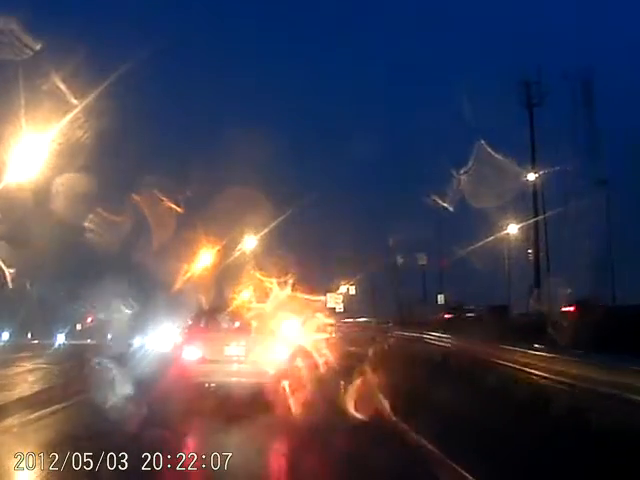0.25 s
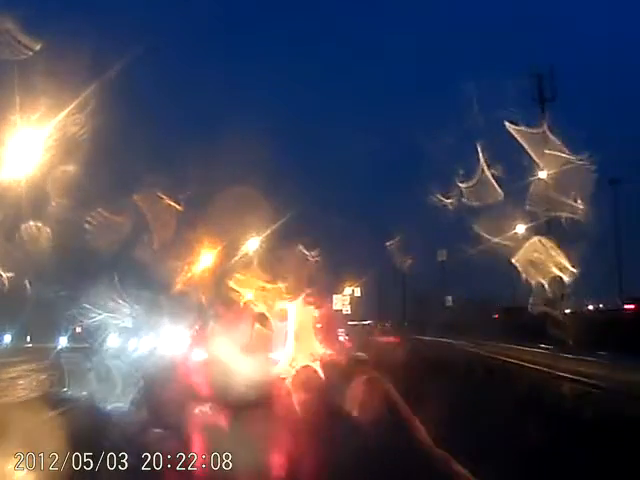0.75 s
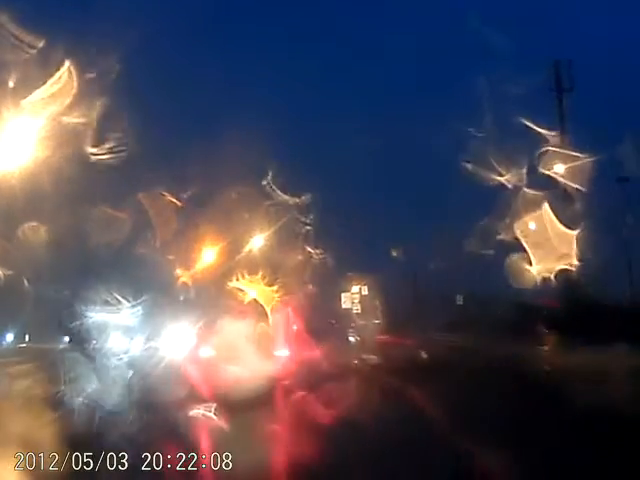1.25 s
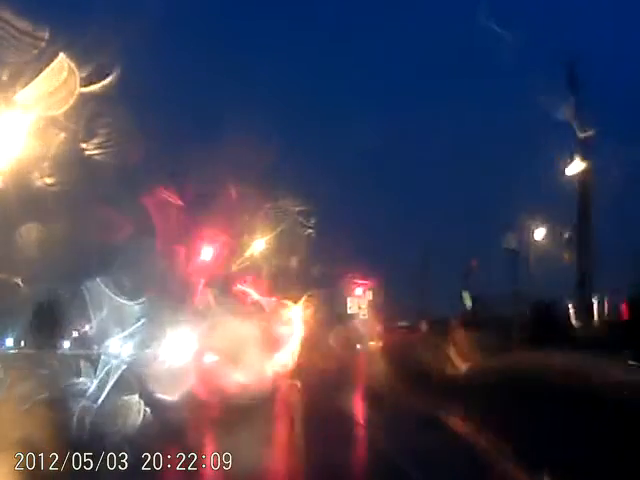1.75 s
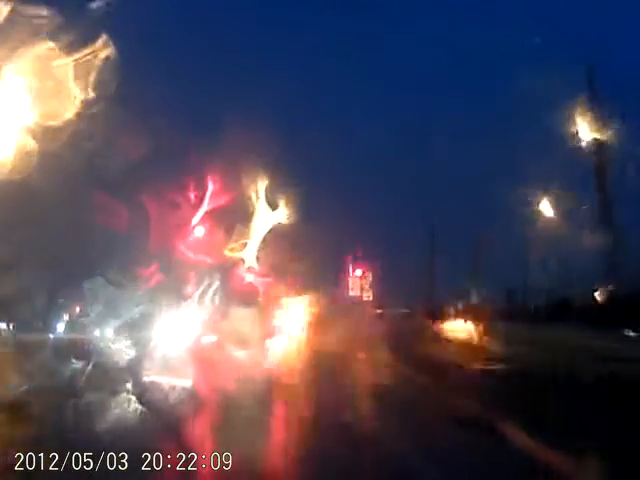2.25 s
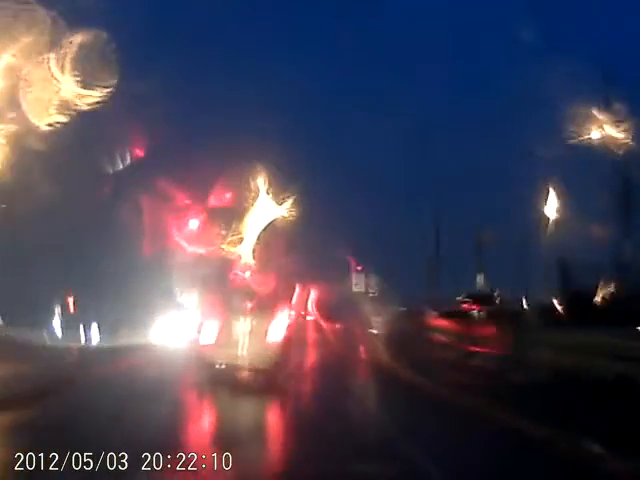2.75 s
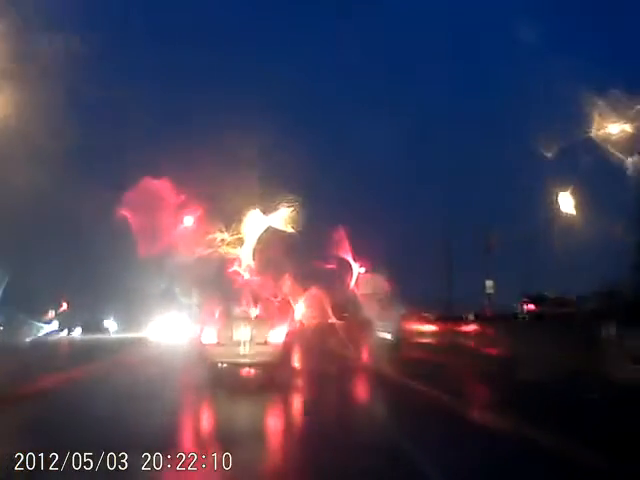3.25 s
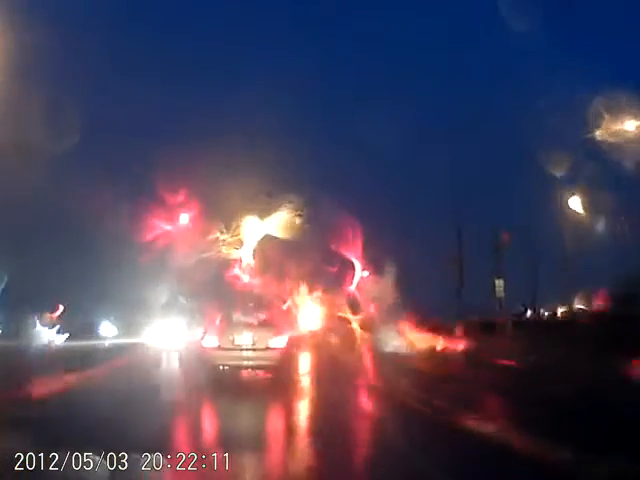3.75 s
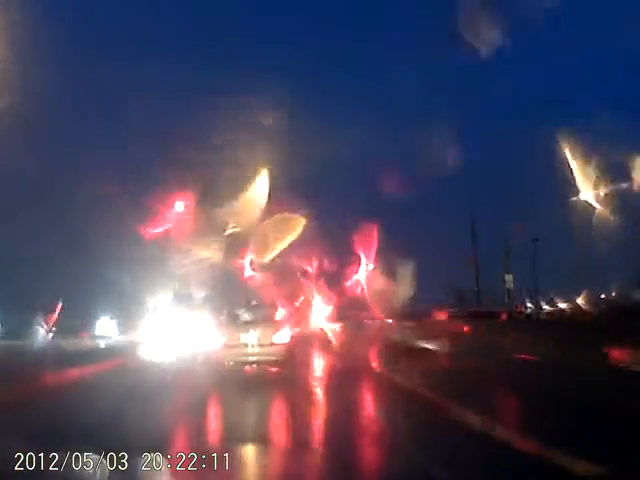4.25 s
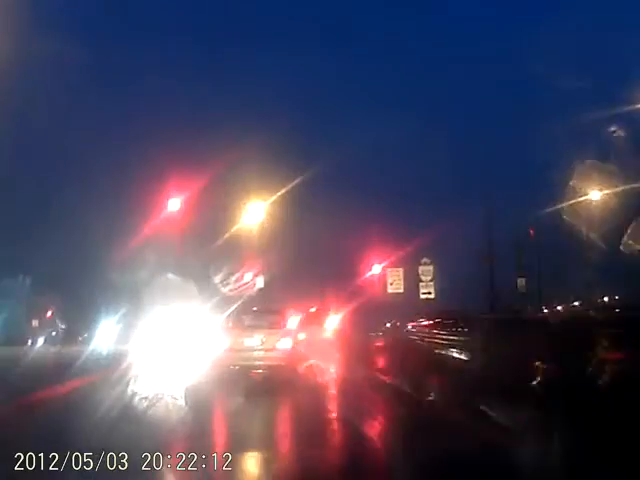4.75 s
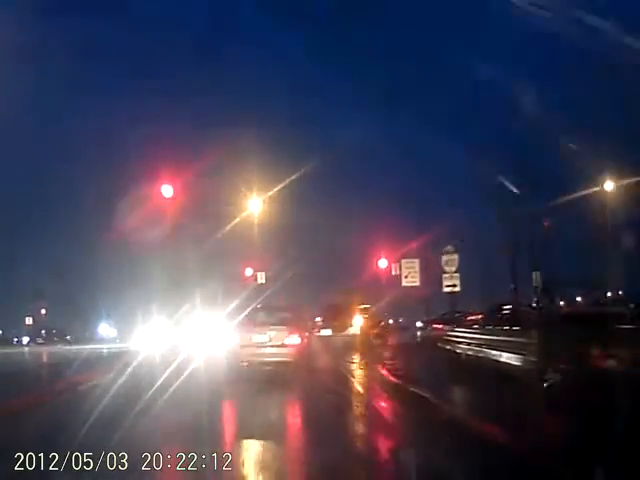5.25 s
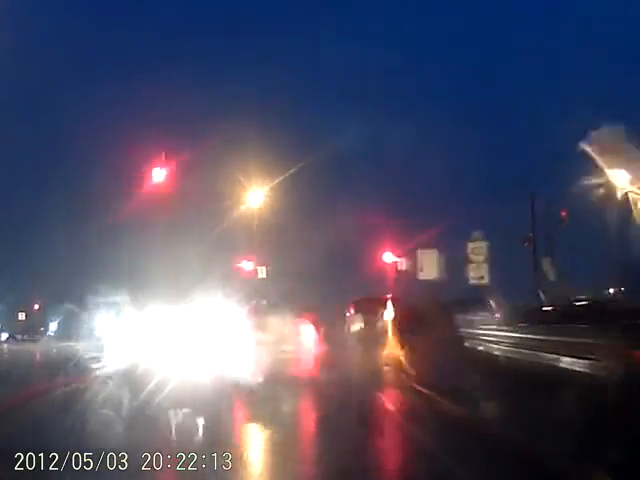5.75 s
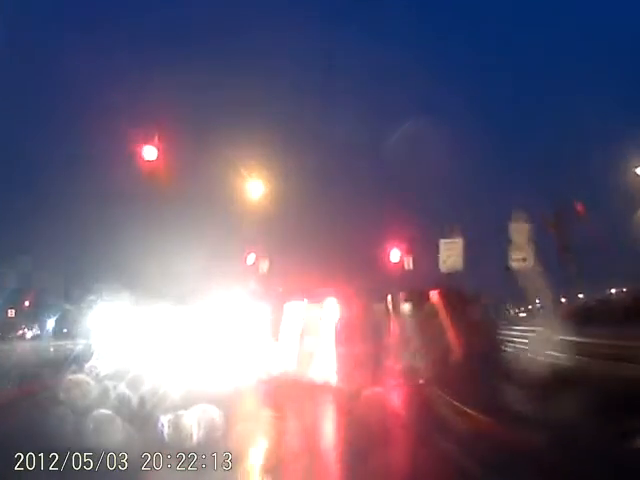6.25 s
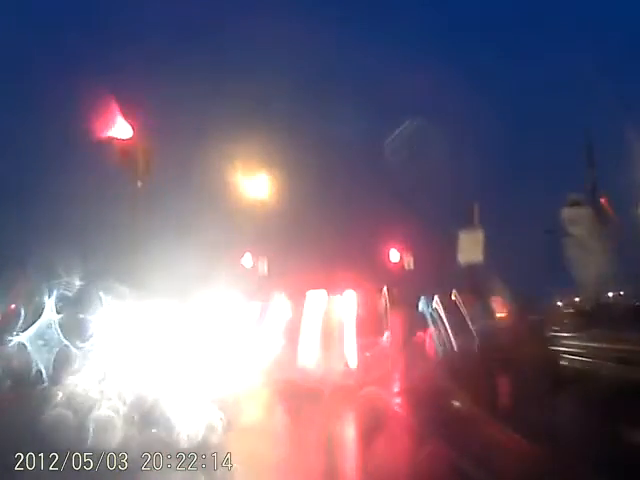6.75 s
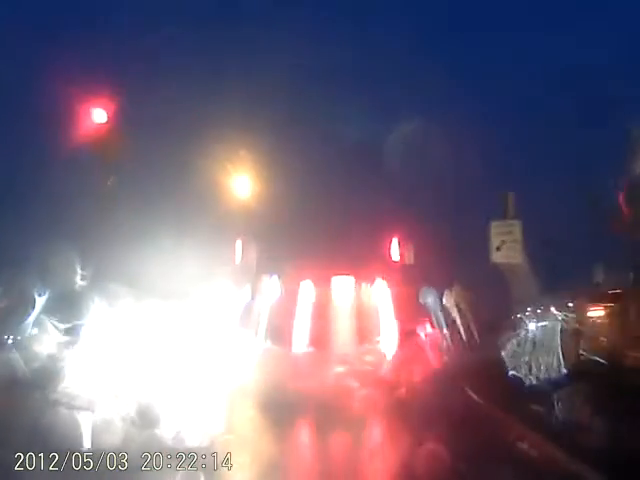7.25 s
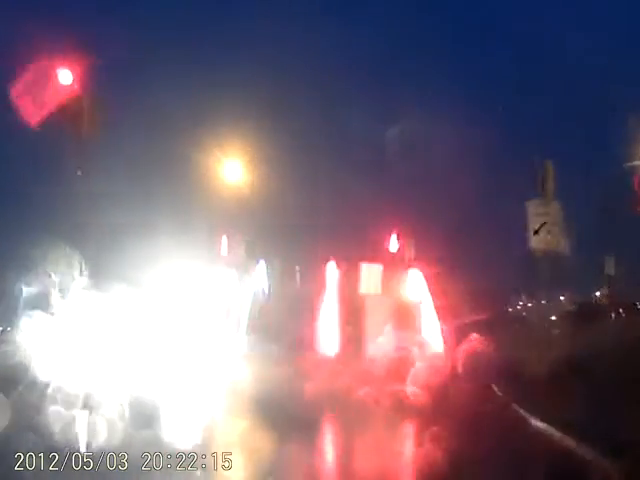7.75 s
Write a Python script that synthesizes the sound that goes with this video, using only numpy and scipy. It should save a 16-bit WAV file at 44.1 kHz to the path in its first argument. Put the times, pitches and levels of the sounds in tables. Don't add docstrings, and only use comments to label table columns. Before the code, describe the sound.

Inside a car on a wet road, rain ticks and taps on windshield and roof over a low engine drone that rises, drops and sinks away.

```python
import sys
import numpy as np
from scipy import signal
from scipy.fft import rfft, irfft
from scipy.io import wavfile
from scipy.ndimage import uniform_filter1d

SR = 44100
rng = np.random.default_rng(int(sys.argv[2]) if len(sys.argv) > 2 else 0)


def unload_wav(signal):
    wavfile.write(
        sys.argv[1],
        SR,
        np.round(np.clip(np.atleast_2d(signal).T, -1, 1) * 32767).astype(np.int16),
    )


def to_linear_factor(level_db):
    exponent = np.asarray(level_db, float) / 20
    return 10 ** exponent


N = 353064
T = np.arange(N) / SR

# (time [s], firing rate [Hz], load [dB])
ENGINE_COURSE = [(0.0, 70.13, 4), (0.2, 72.06, 1), (1.74, 80.5, 0.5), (2.0, 70.5, 1), (2.21, 52.4, -18),
                 (2.41, 40.98, -2), (3.08, 50.4, -2.5), (3.41, 47.4, -3), (3.65, 41.35, -7.5),
                 (4.1, 37.37, -4), (4.28, 44.33, 2), (4.5, 47.95, -2.5), (4.86, 49, 0.5),
                 (5.17, 61.9, -0.5), (5.5, 64.52, -2.5), (5.8, 56.86, -6.5), (6.35, 45.28, -3),
                 (8.01, 35.1, -7)]
# (frequency [Hz], density [dB per Hz])
CABIN_TONE = [(210, -30), (350, -2), (500, -10), (760, -5.5), (850, -2), (950, -5.5), (1090, -6.5),
              (1350, -4.5), (1500, -8), (1790, -10), (2410, -8.5), (2970, -17), (3710, -31), (4820, -61)]


def level(x, db=0):
    return x * to_linear_factor(db) / np.sqrt(np.mean(x ** 2))


def colour(x, table, causal=True):
    size = 8192
    hz, db = np.transpose(table)
    bin_hz = np.arange(size // 2 + 1) * SR / size
    log_gain = np.interp(np.log(bin_hz + 1), np.log(hz), db) * np.log(10) / 20
    if not causal:
        impulse = np.fft.fftshift(irfft(np.exp(log_gain)))
        return signal.fftconvolve(x, impulse)[size // 2:][:N]
    cepstrum = irfft(log_gain)
    cepstrum[1:size // 2] *= 2
    cepstrum[size // 2 + 1:] = 0
    return signal.fftconvolve(x, irfft(np.exp(rfft(cepstrum))))[:N]


def band(x, lo_hz, hi_hz, order=2):
    return signal.sosfilt(signal.butter(order, [lo_hz, hi_hz], "band", fs=SR, output="sos"), x)


def walk(rate):
    hold = int(SR / rate)
    held = np.repeat(rng.standard_normal(N // hold + 1), hold)
    return uniform_filter1d(uniform_filter1d(held, hold), hold)[:N]


def curves(table):
    s, *columns = np.transpose(table)
    return [np.interp(T, s, c) for c in columns]


def add(out, s, sound):
    i = int(s * SR)
    out[i:i + len(sound)] += sound[:N - i]


def decay(t, t60):
    return np.exp(-np.log(1000) * t / t60)


def ring(hz, t60, length=.15):
    t = T[:int(length * SR)]
    return np.sin(2 * np.pi * hz * t) * decay(t, t60)


def scatter(per_s):
    rows = rng.random((int(per_s * N / SR), 4))
    rows[:, 0] *= N / SR
    return rows


def hiss():
    # (frequency [Hz], density [dB per Hz])
    hiss_tone = [(2500, -12), (4000, -0.5), (5000, -2), (6500, -2), (8000, -4), (9200, -3), (10200, -3.5),
                 (13000, -3.5), (14800, -5.5), (15700, -11.5)]
    # (time [s], peak level [dB])
    crackles = [
        (2.299, -35),
        (2.3256, -38),
        (2.3285, -29),
        (2.357, -33),
    ]
    out = level(colour(rng.standard_normal(N), hiss_tone), -61.5)
    for s, db in crackles:
        add(out, s, to_linear_factor(np.array([db])))
    return out


def grit(heard):
    # (frequency [Hz], density [dB per Hz])
    grit_tone = [(3000, -3), (4500, -5), (5800, 1), (7600, -1), (9200, 2), (10300, -7.5), (13000, -20),
                 (16000, -27)]
    # (time [s], peak level [dB])
    edge_ticks = [(0.17, -47), (0.5761, -49), (1.0241, -48), (1.069, -50), (1.1488, -49), (1.4411, -44),
                  (1.6656, -44), (1.6794, -42), (1.8253, -44), (1.9834, -48), (2.1281, -47), (2.157, -43),
                  (2.2687, -42), (2.38, -45), (2.8614, -44), (3.1318, -47), (3.4057, -46), (3.6599, -45),
                  (3.7279, -47), (4.154, -46), (4.2345, -39), (4.3268, -46), (4.4648, -47), (4.6065, -48),
                  (5.4016, -45), (5.5775, -46), (5.9454, -45), (6.2327, -46), (6.883, -49), (7.6979, -41.5)]
    slope = level(uniform_filter1d(np.abs(band(heard, 1900, 3600)), size=90))
    out = to_linear_factor(-60.5) * level(np.tanh(1.14 * slope) ** 1.9) * rng.standard_normal(N)
    small_ticks = [(s, -51 + 6 * (a - .5)) for s, a, _, _ in scatter(per_s=11)]
    for s, db in edge_ticks + small_ticks:
        add(out, s, to_linear_factor(db + 3.5) * rng.standard_normal(600) * np.exp(-T[:600] / 0.002))
    return colour(out, grit_tone)


def jolts(firing_hz):
    # (time [s], strength [dB], sway over boom [dB])
    road_jolts = [(0.36, -32, 6), (0.56, -39, 2), (1.2, -39, 2), (1.4, -31, 0), (1.7, -37, 8),
                  (1.9, -25, -9), (2.12, -20.5, 6), (2.32, -14.5, -1.5), (2.54, -21, -5), (3.2, -49, -21),
                  (3.88, -24.5, -1), (4.0, -34, -2), (4.35, -17.5, -1), (4.77, -25, -9), (5.08, -29, -16),
                  (5.33, -27, 12), (5.46, -25.5, -6), (6.26, -28.5, 1), (6.52, -37.5, 20), (6.73, -33, 3),
                  (6.91, -31, -2), (7.07, -30, 6), (7.2, -37, -2), (7.31, -32, 5), (7.45, -20, 3.5),
                  (7.839, -23, -6)]
    attack_s, release_s = 0.048, 0.076
    smooth_sway_db, smooth_boom_db = -36, -34
    shudder_db = 0.25 * (62 - firing_hz)
    sway, boom = to_linear_factor(smooth_sway_db + shudder_db), to_linear_factor(smooth_boom_db + shudder_db)
    for s, db, tilt_db in road_jolts:
        swell = np.exp(-((T - s) / np.where(T < s, attack_s, release_s)) ** 2)
        sway = sway + to_linear_factor(db + tilt_db / 2) * swell
        boom = boom + to_linear_factor(db - tilt_db / 2) * swell
    drone = to_linear_factor(-32 + .16 * (firing_hz - 57)) * (1 + 0.13 * level(boom))
    return sway, boom, drone


def road():
    # (frequency [Hz], density [dB per Hz])
    drone_tone = [(29, -10), (50, -9), (65, -10.5), (97, -13.5), (129, -10.5), (157, -17.5), (290, -25),
                  (342, -31.5), (600, -35.5), (780, -70.5), (1320, -120)]
    sway_gain, boom_gain, drone_gain = jolts(curves(ENGINE_COURSE)[0])
    noise = rng.standard_normal((4, N))
    sway = band(np.tanh(4.5 * level(band(noise[0], 12.96, 19.4))), 2.37, 37.7)
    boom = band(np.tanh(2.4 * level(band(noise[1], 26.7, 42.5))), 16, 73)
    drone = to_linear_factor(0.36 * walk(9)) * level(colour(noise[2], drone_tone), 2.04)
    pan_hz, pan_width_hz = 128.1, 27.5
    floor_pan = level(band(noise[3], pan_hz - pan_width_hz / 2, pan_hz + pan_width_hz / 2), -42)
    return sway_gain * level(sway) + boom_gain * level(boom) + drone_gain * drone + floor_pan


def suspension():
    # (time [s], peak level [dB], frequency [Hz])
    bumps = [
        (2.278, -20, 31.7),
        (2.326, -9.5, 37.7),
        (2.531, -19, 37),
        (3.884, -12, 23.7),
        (7.8, -27, 29.7),
    ]
    # (time [s], peak level [dB], frequency [Hz])
    knocks = [
        (3.812, -29, 242),
        (4.343, -29, 316.7),
        (5.049, -29, 231),
        (7.348, -32.5, 232.4),
        (7.811, -30.5, 235),
    ]
    out = np.zeros(N)
    for s, db, hz in bumps:
        add(out, s, to_linear_factor(db) * ring(hz, 0.47, length=.3))
    for s, db, hz in knocks:
        modes = ring(hz, 0.15) + .5 * ring(1.33 * hz, 0.18) + 0.49 * ring(1.9 * hz, 0.07)
        add(out, s, to_linear_factor(db + 0.5) * modes)
    return out


def whines():
    # (start [s], end [s], start frequency [Hz], end frequency [Hz], level [dB])
    glides = [
        (.2, .54, 307, 291, -33),
        (.08, .45, 200, 197, -35),
        (.24, .45, 606, 590, -43),
        (.32, .5, 700, 696, -44),
        (0, .12, 606, 604, -43),
    ]
    out = np.zeros(N)
    for t0, t1, hz0, hz1, db in glides:
        u = np.clip((T - t0) / (t1 - t0), 0, 1)
        phase = 2 * np.pi * np.cumsum(hz0 + (hz1 - hz0) * u) / SR
        out += to_linear_factor(db) * np.sin(np.pi * u) * np.sin(phase)
    return out


def wiper():
    # (frequency [Hz], width [Hz], level [dB], time to fade 60 dB [s])
    squeak = [
        (2100, 75, -31.5, 0.18),
        (1840, 200, -36.5, 0.29),
    ]
    out = np.zeros(N)
    for hz, width, db, t60 in squeak:
        out += level(band(rng.standard_normal(N), hz - width / 2, hz + width / 2), db) * decay(T, t60)
    return out


def engine():
    multiples_db = [-20, -29.5, -37.5, -44.5, -46, -52, -57, -68, -56.5]
    # (frequency [Hz], width [Hz], level [dB])
    booms = [(50, 15, 2.5), (75.5, 17, -5), (101.6, 16.55, 5.5), (115, 10.6, 7.5), (139, 14.6, -9),
             (167.2, 19.5, -1.5), (192, 24, 7.5), (210.7, 17.3, 2), (229, 26, -2), (335, 61, 2),
             (478, 126, 1)]

    def cabin_gain(f):
        power = to_linear_factor(2 * -19)
        for centre, width, db in booms:
            power = power + to_linear_factor(2 * db) / (1 + (2 * (f - centre) / width) ** 2) ** 2
        return np.sqrt(power)

    hz, load_db = (uniform_filter1d(c, size=3000) for c in curves(ENGINE_COURSE))
    fall_hz_per_s = -uniform_filter1d(np.gradient(hz) * SR, size=4000)
    lift_db = 0.15 * np.clip(fall_hz_per_s - 20, 0, 60)
    phase = 2 * np.pi * np.cumsum(hz * (1 + 0.0018 * walk(12))) / SR
    out = np.zeros(N)
    for k, db in enumerate(multiples_db):
        multiple_db = db + load_db + walk(9)
        if k > 0:
            multiple_db = multiple_db - lift_db
        if k > 1:
            multiple_db = multiple_db + 0.09 * (hz - 74)
        out += np.sqrt(2) * to_linear_factor(multiple_db) * cabin_gain((k + 1) * hz) * np.sin((k + 1) * phase + k)
    return out


def rain(per_s=500, spread_db=3.0, spot_db=4.5, tail_s=0.062, click=0.77, far=0.79):
    # (time [s], level [dB])
    rainfall = [(0.0, -36.5), (0.24, -42), (0.51, -38.5), (0.85, -40), (1.54, -38.5), (1.87, -39.5),
                (3.86, -39.5), (4.12, -38.5), (4.86, -40.5), (6.42, -41.5), (7.0, -42.5), (8.01, -41.5)]
    count = int(per_s * N / SR)
    when = (rng.random(count) * N).astype(int)
    strength = to_linear_factor(spread_db * np.minimum(rng.exponential(size=count), 3.1))
    power_decay = np.exp(-2 * np.log(1000) / (tail_s * SR))
    out = np.zeros(N)
    for hz in 350 * 2 ** np.arange(0, 4, .5):
        hits = np.bincount(when, strength * to_linear_factor(spot_db * rng.standard_normal(count)), N)
        splash = np.sqrt(signal.lfilter([1], [1, -power_decay], hits ** 2))
        wet = np.hypot(level(splash), far) * rng.standard_normal(N) - click * level(hits)
        panel = level(band(wet, hz / 1.22, hz * 1.22, order=1))
        out += np.sqrt(hz) * panel * to_linear_factor(0.5 * walk(17))
    out *= to_linear_factor(0.8 * walk(5.055))
    return level(colour(out, CABIN_TONE, causal=False), 2.24) * to_linear_factor(curves(rainfall)[0])


def taps():
    # (time [s], peak level [dB], pitch of the struck spot [Hz])
    large_drops = [(0.129, -18, 1370), (0.347, -28, 851), (0.64, -25, 910), (0.765, -18, 887),
                   (0.868, -24, 776), (1.069, -19, 1016), (1.148, -18, 1180), (1.442, -14.5, 962),
                   (1.567, -22, 980), (1.666, -19, 857), (2.157, -18, 851), (2.513, -21, 800),
                   (2.773, -18, 2010), (2.834, -24, 902), (2.856, -15.5, 920), (3.0, -32, 1210),
                   (3.405, -14, 854), (3.474, -19, 821), (3.66, -20, 1300), (3.996, -23, 870),
                   (4.235, -24, 2302), (4.464, -19, 834), (4.789, -16, 783), (4.886, -21, 1253),
                   (5.874, -25, 1339), (5.945, -28, 899), (6.592, -23, 838.4), (6.883, -19, 879.6),
                   (6.942, -17.5, 1240), (7.445, -24, 2430)]
    # (time [s], peak level [dB])
    patter = [(0.162, -31), (0.4167, -33), (0.6146, -34), (0.7656, -33), (0.9048, -27), (1.0695, -32),
              (1.148, -36), (1.274, -26.5), (1.4411, -31), (1.5676, -25), (1.666, -24), (2.1246, -28.5),
              (2.198, -24.5), (2.5584, -30), (2.6469, -27), (2.7725, -26), (2.836, -26.5), (2.923, -28),
              (3.275, -25.5), (3.407, -27), (3.7274, -35), (4.127, -27), (4.2351, -27), (4.602, -26),
              (4.8888, -26.5), (5.2095, -28), (5.9447, -29), (6.8838, -28), (7.1047, -36), (7.4459, -25)]
    spots_hz = [836, 1300, 2340]
    # (time [s], peak level [dB], frequency [Hz], ring time [s])
    bounces = [
        (5.4030, -15, 1950, .008),
        (5.4030, -22, 1150, .012),
        (5.4042, -27, 1650, .04),
        (5.4091, -22, 1600, .022),
        (5.4103, -29, 2400, .035),
    ]
    drops = [(s, db, hz, 0.068) for s, db, hz in large_drops]
    for s, a, b, c in scatter(per_s=4.4):
        hz = spots_hz[int(3 * b ** 2)] * (1 + 0.164 * (c - .5))
        drops.append((s, -30.5 + 6 * (2 * a - 1), hz, 0.083))
    drops += [(s, db + 7.5, 2450, .04) for s, db in patter]

    clicks, after = np.zeros(N), np.zeros(N)
    t = T[:SR // 10]
    for s, db, hz, t60 in drops:
        splash = rng.standard_normal(len(t)) * decay(t, np.clip(t60, .01, .3))
        splash = band(splash, 0.61 * hz, min(2.9 * hz, 3000.))
        add(clicks, s + .0006, -to_linear_factor(np.array([db])))
        add(after, s, to_linear_factor(db - 18.0) * ring(hz, 1.8 * t60)[:len(t)] + to_linear_factor(db - 6.5) * splash)
    for s, db, hz, t60 in bounces:
        add(after, s, to_linear_factor(db) * ring(hz, t60))
    splash_top_hz = 3170
    after = band(band(after, 130, splash_top_hz, order=4), 60, 1.1 * splash_top_hz, order=3)
    click_peak = colour(T == 0, CABIN_TONE, causal=False)[0]
    return after + to_linear_factor(-8.0) * colour(clicks, CABIN_TONE, causal=False) / click_peak


def scene():
    return (road() + suspension() + whines() + wiper() + engine() + rain() + taps())[None]


def top_cut(x):
    return signal.sosfilt(signal.butter(12, 15719, fs=SR, output="sos"), x)


def record(dry):
    ceiling = .6
    limited = dry / (1 + (dry / ceiling) ** 6) ** (1 / 6)
    return top_cut(limited + hiss() + grit(dry[0]) - .0043)


dry = scene()
out = record(dry)
unload_wav(out)
```